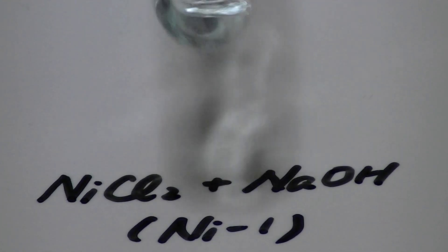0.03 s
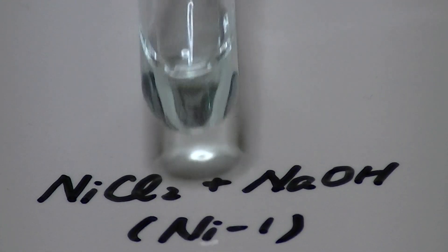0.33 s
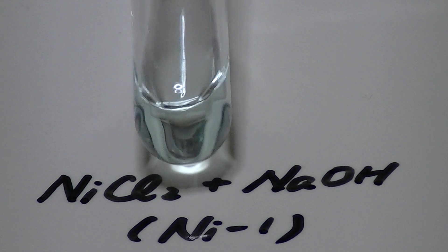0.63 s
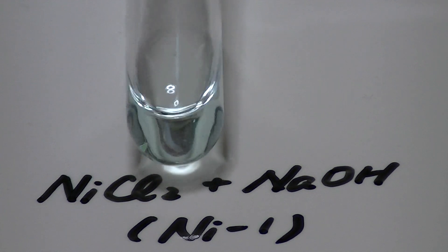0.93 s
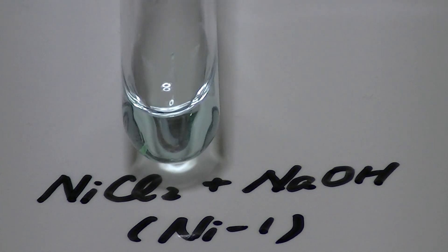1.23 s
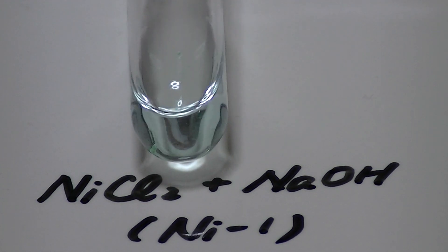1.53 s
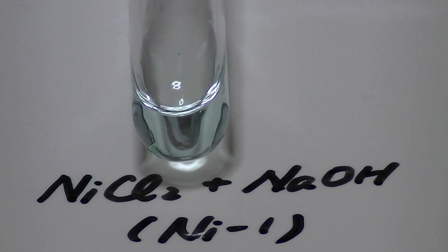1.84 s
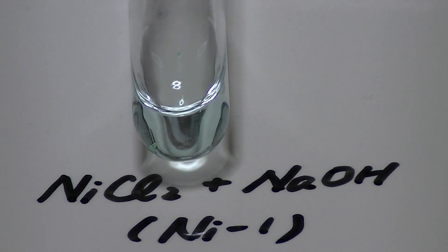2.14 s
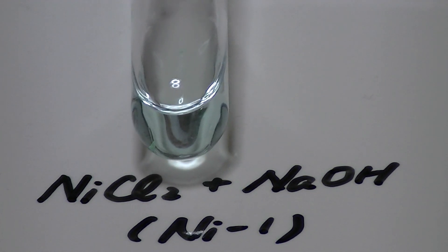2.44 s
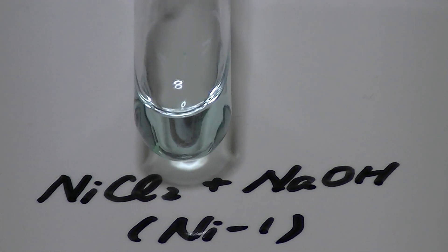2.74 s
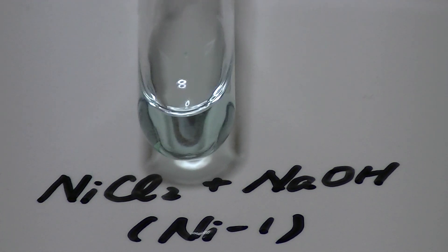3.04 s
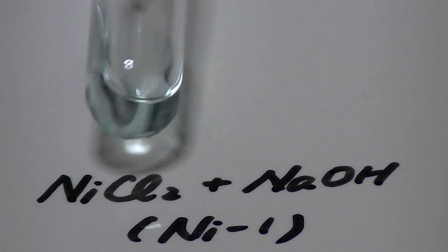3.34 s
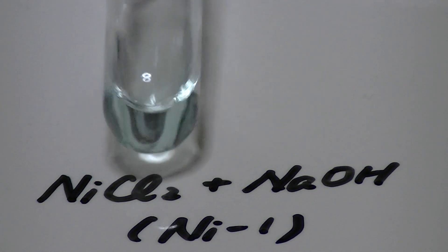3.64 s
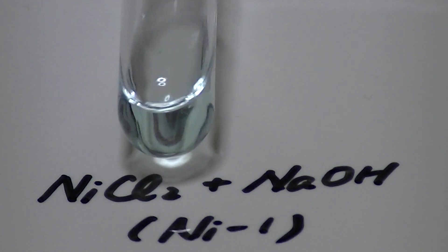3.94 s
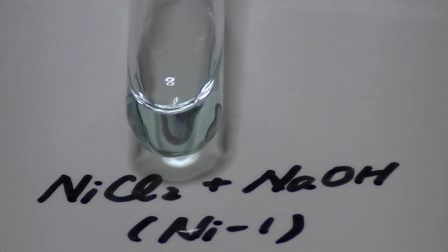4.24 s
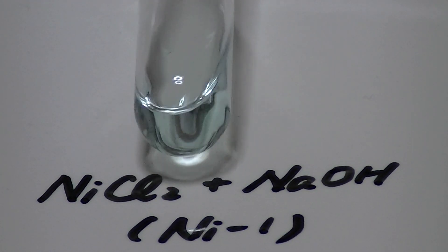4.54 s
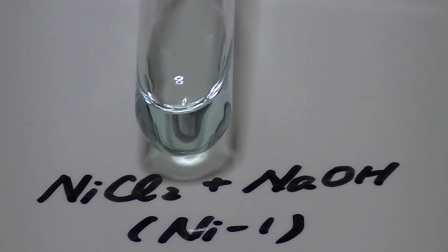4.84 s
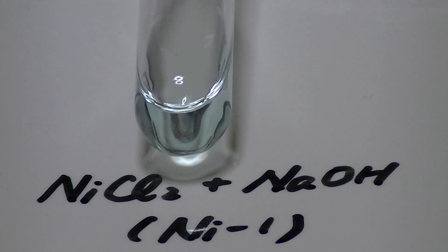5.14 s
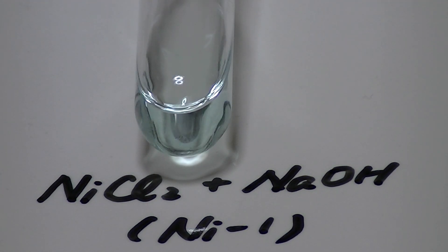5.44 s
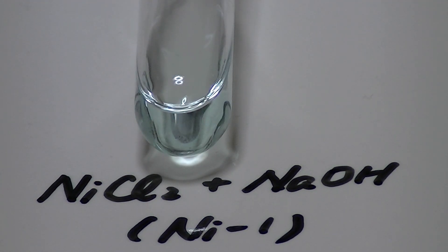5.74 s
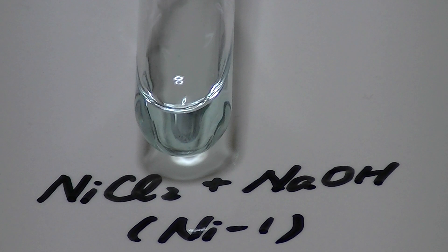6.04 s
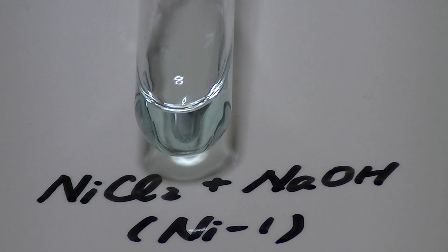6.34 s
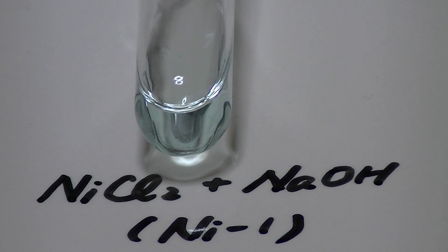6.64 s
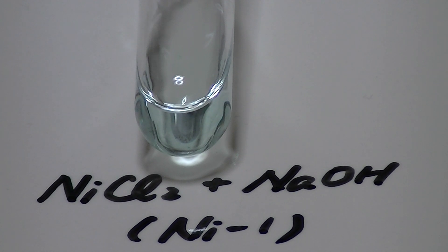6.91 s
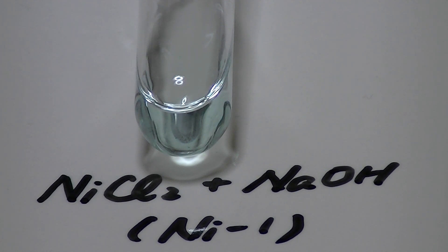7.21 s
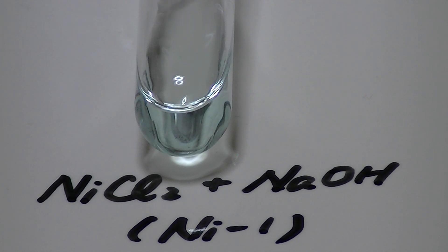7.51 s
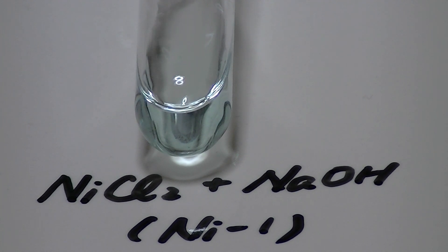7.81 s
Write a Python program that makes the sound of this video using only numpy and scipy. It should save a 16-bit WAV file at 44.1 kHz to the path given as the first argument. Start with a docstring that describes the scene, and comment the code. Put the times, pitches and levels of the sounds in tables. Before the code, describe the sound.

At about 0.5 seconds a glass test tube drops into its holder with a close, bright double clink and a light knock. A faint tap follows at 2.4 seconds. From 3.1 seconds a thin, more distant whistle of air sinks in pitch, and around 3.6 seconds the tube is nudged, giving a quick cluster of ringing clinks. The whistle returns lower at 4.1 seconds and keeps falling until 4.7. Between 4.9 and 5.9 seconds it breaks into five short, diving chirps, with a few soft bumps, followed by faint gurgles until 6.4. From about 6 seconds something swishes over the bench in short grainy strokes with small dry taps, thinning out towards 8 seconds. Quiet room tone fills the small lab throughout, while a camera's lens drive faintly ticks and whines until 2.4 seconds and again from 3.8 to 5.7.

```python
"""A glass test tube with a little water clinks into its holder in a small lab and is later nudged:
each contact rings the glass and knocks the holder. Further off a thin whistle sinks in pitch and breaks
up into chirps and faint gurgles, like air drawn back through a wet wash-bottle nozzle. Then something
swishes over the bench with small taps. A camera's lens drive ticks and whines over quiet room tone."""
import sys
import numpy as np
from scipy import signal
from scipy.fft import rfft, irfft
from scipy.io import wavfile
from scipy.ndimage import uniform_filter1d

SR = 44100
rng = np.random.default_rng(int(sys.argv[2]) if len(sys.argv) > 2 else 0)


def persist_wave(psi):
    """Save psi, clipped to +-1, as 16-bit WAV."""
    counts = np.round(np.clip(psi, -1, 1) * 32767).astype(np.int16)
    wavfile.write(sys.argv[1], SR, np.atleast_2d(counts).T)


N = 347050
TIME = np.arange(N) / SR
TOP_HZ = 15850


def amp(db):
    """Decibels to gain."""
    return 10 ** (np.asarray(db) / 20)


def unit(x):
    """Scales to rms 1."""
    return x / np.sqrt(np.mean(x ** 2) + 1e-20)


def read(points, hz):
    """Reads a curve on a log-frequency axis."""
    f, value = np.transpose(points)
    return np.interp(np.log(hz + 1), np.log(f + 1), value)


def add(mix, s, sound):
    """Mixes a sound in at s seconds."""
    part = mix[..., max(round(s * SR), 0):][..., :sound.shape[-1]]
    part += sound[..., :part.shape[-1]]


def colour(x, eq):
    """Applies an EQ curve and keeps the energy."""
    n = x.shape[-1]
    gain = amp(read(eq, np.fft.rfftfreq(n, 1 / SR)))
    return np.std(x) * unit(irfft(rfft(x) * gain, n))


def drift(hz):
    """Random modulator of rms 1 that turns hz times a second."""
    return unit(np.interp(TIME * hz, np.arange(20000), rng.standard_normal(20000)))


def flutter(t, hz):
    """Complex random modulator for each ear, rms about 1, that turns hz times a second."""
    knots = rng.standard_normal((2, 200)) + 1j * rng.standard_normal((2, 200))
    return np.array([np.interp(t * hz, np.arange(200), ear) for ear in knots]) * np.sqrt(3 / 4)


def pan(db):
    """Stereo gains, left louder than right by db."""
    return amp([[db / 2], [-db / 2]])


def burst(envelope, eq, shared):
    """A puff of noise, partly shared by the two ears, coloured by the thing struck."""
    noise = rng.standard_normal((2, len(envelope))) + shared * rng.standard_normal(len(envelope))
    puff = np.pad(unit(noise) * envelope, ((0, 0), (0, len(envelope))))
    return colour(puff, eq)[:, :len(envelope)]


def room(x, wet_db, early_db):
    """The lab: direct sound, early echoes from bench and walls, and a short tail; keeps the energy."""
    # reverb decay: f/Hz, t60/s
    decay = [(200, 1), (1000, 0.33), (3000, 0.35), (6000, 0.33), (14000, 0.16)]
    t = np.arange(SR // 2) / SR
    reflections = rng.choice([-1., 1.], (2, len(t))) * (rng.random((2, len(t))) < .12)
    hz, age, spectrum = signal.stft(reflections, SR, nperseg=256)
    spectrum *= amp(-60 * age / read(decay, hz)[:, None])
    tail = signal.istft(spectrum, SR, nperseg=256)[1][:, :len(t)] * np.minimum(t / 0.016, 1)
    early = reflections[:, ::-1] * np.exp(-t / 0.014) * (t > .001)
    response = amp(wet_db) * tail / np.linalg.norm(tail[0])
    response += amp(early_db) * early / np.linalg.norm(early[0])
    response[:, 0] += 1  # direct sound
    return signal.fftconvolve(np.atleast_2d(x), response / np.linalg.norm(response[0]), axes=1)[:, :N]


def room_tone():
    """A bed of soft air noise, partly opposed in the two ears, with faint steady tones."""
    # air EQ: f/Hz, gain/dB
    air_eq = [(15, -48), (25, -19), (70, -11), (116, -5.5), (255, 1.5), (307, 2), (654, -3.5), (834, -1.5),
              (1250, -7.5), (2330, -12.5), (2730, -13.5), (3050, -15), (10500, -29), (11400, -29.5),
              (15800, -36.5)]
    # stereo image of the air: f/Hz, left-right correlation
    image = [(30, 0.66), (120, -0.44), (230, -0.87), (600, -0.67), (1200, -0.58), (2500, -0.28),
             (8000, -0.11), (15000, -0.085)]
    # tones of the mains and the camera: f/Hz, relative level/dB, phase between the ears/rad
    tones = [(119.5, -72, 2.03), (502, -71, 3), (11100, -90.5, 1.3), (11600, -89, 1.9)]
    left, independent = rfft(rng.standard_normal((2, N)))
    correlation = read(image, np.fft.rfftfreq(N, 1 / SR))
    right = correlation * left + np.sqrt(1 - correlation ** 2) * independent
    air = colour(irfft(np.array([left, right]), N), air_eq) * amp(-55 + .4 * drift(5))
    hum = sum(amp(db + 5.5) * np.sin(2 * np.pi * hz * TIME + np.array([[0], [lead]]))
              for hz, db, lead in tones)
    return air + hum


def lens_drive():
    """The hunting focus drive ticks in double steps that rattle its barrel, under a thin pulsing whine."""
    # resonances of the lens barrel: f/Hz, gain/dB
    barrel_eq = [(100, -31), (400, -33), (800, 14), (1100, -6.5), (1700, -13.5), (2150, 0), (2600, -25),
                 (6000, -38)]
    # spells of focus hunting: start/s, end/s
    hunting = [(0, 2.36), (3.76, 5.68)]
    tick_rate_hz, ring_hz, whine_hz = 29.97, 800, 2724
    t, rings, ticking = np.arange(SR // 30) / SR, np.zeros((2, N)), np.zeros(N)
    starts = np.arange(int(N / SR * tick_rate_hz)) / tick_rate_hz
    double_step = np.exp(-((t - .0035) / 0.0028) ** 2) + np.exp(-((t - .0085) / 0.0037) ** 2)
    for s, (accent, detune, turn, spread) in zip(starts, rng.standard_normal((len(starts), 4))):
        if any(start <= s < end for start, end in hunting):
            hz = ring_hz * (1 + .03 * detune)
            phase = 2 * np.pi * hz * t + np.pi * turn + np.array([[0], [1.06 + 0.78 * spread]])
            add(rings, s, amp(-60 + 2 * accent) * double_step * np.sin(phase))
            add(ticking, s, amp(accent) * double_step)
    rattle = amp(-62.5) * ticking * colour(rng.standard_normal((2, N)), barrel_eq)
    running = (TIME * tick_rate_hz / 3 - .6) % 1 < .77  # a short gap ten times a second
    gate = uniform_filter1d(1. * running, 200)
    whine = amp(-68) * gate * np.sin(2 * np.pi * np.cumsum(whine_hz + 20 * drift(150)) / SR)
    return rings + rattle + whine


def test_tube():
    """Each contact rings the glass modes and knocks the holder; the loose tube makes the ring flutter."""
    # contacts, relative levels: t/s, ring level/dB, mid boost/dB, treble boost/dB, knock level/dB
    clinks = [(0.5262, -19.5, -5.5, -1.5, -23), (0.5495, -31, -14, -5.5, -26), (3.2660, -43, -6, -30, -66),
              (3.5785, -23.5, 0, -7.5, -27), (3.6414, -17.5, 3, 0, -18), (3.6550, -43, 17.5, -20, -22)]
    # modes of the tube: f/Hz, relative level/dB, ungripped t60/s, left over right/dB
    glass_modes = [(1224, -22.5, 0.054, 23), (2100, -3, 0.058, 18), (2160, 0.5, 0.21, 2),
                   (3289, -17, 0.071, -14), (3280, -5.5, 0.082, 2), (3535, -13, 0.12, 18),
                   (3625, -8, 0.18, -8), (3650, -10.5, 0.3, 7), (5535, -17, 0.38, 0),
                   (5724, -4.5, 0.13, 1.5), (7730, -20, 0.27, -1), (9240, -25, .1, 16),
                   (8350, -20, 0.19, 3), (10072, -8.5, .18, -0.5), (9900, -21, .13, 4),
                   (12880, -33, .15, -4), (13200, -22, 0.18, -4), (15300, -31, 0.074, -3)]
    # body of the holder: f/Hz, gain/dB
    holder_eq = [(60, -55), (170, -47), (320, -12), (750, -8.5), (1030, -10), (1280, -3.5), (1700, -5.5),
                 (2200, 8), (2700, -12), (3400, 3), (4300, -18.5), (6000, -12), (7000, -27), (8600, -15),
                 (13500, -43)]
    grip_db_per_s2 = 450  # the holder's grip tightens as the tube settles and chokes the ring
    t, ring, knocks = np.arange(SR // 3) / SR, np.zeros((2, N)), np.zeros((2, N))
    hz, db, t60, side_db = np.transpose(glass_modes)
    mids, treble = (hz > 3000) & (hz < 4500), hz >= 4500
    # each mode radiates its own way
    ear_phase = rng.uniform(1.0, 1.94, len(hz)) * rng.choice([-1, 1], len(hz))
    looseness = .5 * (1 - np.exp(-t / .008))
    attack = 1 - np.exp(-t / 0.00067)
    blow = (np.exp(-t / 0.003) + 0.65 * np.exp(-t / 0.023)) * (1 - np.exp(-t / 0.00019))
    for s, ring_db, mid_db, treble_db, knock_db in clinks:
        level_db = ring_db - 2 + db + mid_db * mids + treble_db * treble
        for k in range(len(hz)):
            phasor = np.exp(1j * (2 * np.pi * hz[k] * (t + s) + np.array([[0], [ear_phase[k]]])))
            mode = (phasor * (1 + looseness * flutter(t, 78))).imag
            envelope = attack * amp(level_db[k] - 60 * t / t60[k] - grip_db_per_s2 * t ** 2)
            add(ring, s, pan(side_db[k]) * envelope * mode)
        add(knocks, s, amp(knock_db - 6) * burst(blow, holder_eq, shared=3.8))
    return room(ring, wet_db=-22, early_db=-22) + pan(1) * room(knocks, wet_db=-12, early_db=-3.5)


def bench_taps():
    """Short dead blows: the harder the contact, the higher its band; low bumps ring longer."""
    # taps and bumps: t/s, relative level/dB, centre f/Hz, width/octaves
    taps = [(2.433, -41, 1560, 0.9), (3.265, -45.5, 1400, .7), (5.104, -41, 920, 0.76),
            (5.723, -47.5, 378, 1.2), (5.762, -45, 610, 0.93), (5.805, -40, 1760, 0.66),
            (6.046, -33.5, 11000, 1.2), (6.0662, -35.5, 2500, 1.6), (6.137, -34.5, 2230, 0.68),
            (6.503, -31.5, 4000, 5), (6.604, -39.5, 8000, 0.61), (6.844, -41.5, 3000, 1.3),
            (6.873, -35, 6500, 3.3), (7.1561, -41.5, 9700, 0.45), (7.506, -48.5, 4000, 1.3),
            (7.536, -35.5, 3280, 3.9), (7.826, -41.5, 1390, 0.86)]
    dead_t60_s, bench_hz = 0.018, 825  # below bench_hz the bench rings on
    low_cut_hz, high_cut_hz = 180, 11700  # too small for deep bass, too blunt for the very top
    t, out = np.arange(SR // 4) / SR, np.zeros((2, N))
    hz = np.geomspace(40, 20000, 40)
    for s, db, centre_hz, octaves in taps:
        band_db = -30 * np.log10(1 + (np.log2(hz / centre_hz) / octaves) ** 2)
        band_db -= 10 * np.log10(1 + (low_cut_hz / hz) ** 4)
        band_db -= 10 * np.log10(1 + (hz / high_cut_hz) ** 8)
        t60 = dead_t60_s * (1 + (bench_hz / centre_hz) ** 3)
        blow = amp(db + 3 - 60 * t / t60) * (1 - np.exp(-t / 0.0013))
        add(out, s, burst(blow, np.transpose([hz, band_db]), shared=1.0))
    return room(out, wet_db=-9.5, early_db=-6.5)


def whistle():
    """Two surges of air sink in pitch as suction fades; harmonics light up as they cross resonances."""
    # pitch curve, one list a surge: t/s, f/Hz
    glides = [
        [(3.08, 5590), (3.098, 5550), (3.126, 4203), (3.316, 3538), (3.382, 3677), (3.49, 3254), (3.56, 3228)],
        [(4.14, 2658), (4.212, 2592), (4.222, 2528), (4.38, 2423), (4.502, 2177), (4.678, 2062), (4.72, 2110)],
    ]
    # surges that swell, hold, fade and stop: t/s, length/s, hold/s, relative level/dB, fade/(dB/s)
    surges = [(3.07, 0.804, 0.21, -45, 33.5), (4.12, 0.54, 0.16, -40, 56)]
    # resonances around the nozzle: f/Hz, gain/dB
    nozzle_eq = [(2100, -0.5), (2500, -4.5), (4000, 1.5), (4250, -8), (4850, -1.5), (5040, -18),
                 (5200, -36), (5650, 1.5), (5950, 1.5), (6450, 2), (6750, -33), (7450, -32), (7800, -47),
                 (8600, -14.5), (10500, -49)]
    attack_s, stop_db_per_s = 0.087, 200
    hz = np.interp(TIME, *np.vstack(glides).T) * (1 + .006 * drift(150))
    flow, t = np.zeros(N), TIME[:2 * SR]
    for s, length, hold, db, fade in surges:
        swell_db = -14.5 * np.maximum(1 - t / attack_s, 0)
        fall_db = fade * np.maximum(t - attack_s - hold, 0) + stop_db_per_s * np.maximum(t - length, 0)
        add(flow, s, amp(db + swell_db - fall_db))
    level = flow * amp(3.5 + 1.5 * drift(60))
    phase = 2 * np.pi * np.cumsum(hz) / SR
    tone = sum(amp(read(nozzle_eq, k * hz) - 2.75 * (k - 1)) * (k * hz < TOP_HZ) * np.sin(k * phase)
               for k in range(1, 5))
    return pan(1) * room(level * tone, wet_db=1, early_db=-1)


def gulps():
    """The last air passes the nozzle in gulps: rough chirps that hang at their top pitch, then dive."""
    # single gulps: t/s, relative level/dB, starting f/Hz, decay time/s
    chirps = [(4.9020, -39.5, 3840, 0.0063), (5.1539, -45.5, 3516, 0.0086), (5.406, -46.5, 3624, 0.011),
              (5.6500, -39, 3460, 0.0053), (5.9010, -42, 3770, 0.0068)]
    # resonances that colour the gulps: f/Hz, gain/dB
    gulp_eq = [(900, -12), (1400, 0), (1880, 7.5), (2300, 0), (2950, -5), (3300, 0.5), (3650, -8),
               (4200, 4.5), (6200, -8), (7000, -18)]
    floor_hz, dive_s, roughness_db = 1150, 0.0094, 3.5
    t, out = np.arange(SR // 20) / SR, np.zeros(N)
    for s, db, start_hz, decay in chirps:
        hz = floor_hz + (start_hz - floor_hz) * np.exp(-(t / dive_s) ** 2)
        phase = 2 * np.pi * np.cumsum(hz) / SR
        tone = amp(read(gulp_eq, hz)) * np.sin(phase)
        tone += amp(read(gulp_eq, 2 * hz) - 15) * np.sin(2 * phase)
        tone *= amp(roughness_db * flutter(t, 627)[0].real)
        envelope = (1 - np.exp(-t / 0.0013)) * np.exp(-t / decay)
        add(out, s, amp(db + 12) * envelope * tone)
    return room(out, wet_db=7.5, early_db=8.5)


def gurgles():
    """The liquid gurgles faintly in short, soft-edged sine glides."""
    # bubbles: t/s, length/s, first f/Hz, last f/Hz, relative level/dB
    bubbles = [(6.05, 0.051, 1595, 1624, -55), (6.12, 0.075, 2588, 2360, -48),
               (6.138, 0.018, 695, 750, -47), (6.309, 0.045, 1215, 1280, -51.5),
               (6.361, 0.037, 1070, 916, -51.5)]
    out = np.zeros(N)
    for s, length, first_hz, last_hz, db in bubbles:
        hz = np.linspace(first_hz, last_hz, int(length * SR))
        tone = np.sin(2 * np.pi * np.cumsum(hz) / SR)
        add(out, s, amp(db + 4.5) * signal.windows.tukey(len(hz), .5) * tone)
    return room(out, wet_db=-4, early_db=-4)


def stroke(s, length, attack_s=0.032, release_s=0.059):
    """Pressure of one stroke: it presses in, holds and lets go."""
    t = TIME - s
    return np.clip(t / attack_s, 0, 1) * np.exp(-np.maximum(t - length, 0) / release_s)


def swish():
    """Sliding friction: tiny slips make a grainy hiss over a duller rub; brief catches lift both."""
    # strokes over the bench, relative levels: t/s, length/s, hiss level/dB, rub level/dB
    strokes = [(5.158, 0.23, -67, -68), (5.939, 0.083, -53, -52), (6.029, 0.19, -46.5, -50),
               (6.21, 0.14, -44.5, -52.5), (6.387, 0.074, -54, -57.5), (6.453, 0.048, -48, -56),
               (6.579, 0.078, -52, -59.5), (6.673, 0.03, -48.5, -57.5), (6.76, .2, -54.5, -62.5),
               (6.826, 0.048, -51.5, -58), (7.027, 0.086, -54, -63), (7.21, 0.48, -66.5, -88),
               (7.81, .05, -64.5, -64)]
    # bright EQ of the slips: f/Hz, gain/dB
    hiss_eq = [(1500, -31), (2500, -3), (3400, 2.5), (4300, -4), (6600, 1), (9000, -1), (11000, -1),
               (13000, -6.5), (15700, -15)]
    # dull EQ of the rubbing body: f/Hz, gain/dB
    rub_eq = [(40, -45), (120, -13), (250, -3), (700, 0.5), (1000, -1), (1600, 4), (2500, 0.5), (3500, -13),
              (5000, -24)]
    catches_per_s, catch_db, catch_decay_s = 22, 7, 0.0026
    contact = stroke(5.0, N / SR)  # the surfaces stay in light contact between strokes
    light_hiss_power = (amp(-73.5) * contact) ** 2
    hiss_power, rub_power = light_hiss_power.copy(), (amp(-67.5) * contact) ** 2
    for s, length, hiss_db, rub_db in strokes:
        pressure = stroke(s, length)
        hiss_power += (amp(hiss_db) * pressure) ** 2
        rub_power += (amp(rub_db) * pressure) ** 2
    triggers = rng.random(N) < catches_per_s / SR
    catches = signal.lfilter([1], [1, -np.exp(-1 / (catch_decay_s * SR))], triggers + 1e-18)
    pressed = np.sqrt(1 - light_hiss_power / (hiss_power + 1e-18))  # only a pressed stroke catches
    lift_db = catch_db * np.minimum(catches, 1) * pressed
    hiss_level = np.sqrt(hiss_power) * amp(0.81 * drift(130) + lift_db)
    slips = rng.standard_normal((3, N))  # left, right, centre
    slips *= amp(2.8 * np.minimum(rng.exponential(1, (3, N)), 6))  # a few slips stand out
    slips *= rng.random((3, N)) < .2
    hiss = colour(unit(slips[:2] + 0.35 * slips[2]), hiss_eq)
    grain = rng.standard_normal((3, N))
    rub = colour(unit(grain[:2] + 1.1 * grain[2]), rub_eq)
    rub_level = np.sqrt(rub_power) * amp(1 + 1.84 * drift(70) + lift_db)
    return hiss * hiss_level + rub * rub_level


def scene():
    """The stereo mix: glass, air and water, bench, then the background."""
    return (test_tube() + whistle() + gurgles() + gulps()
            + bench_taps() + swish() + lens_drive() + room_tone())


def record(dry):
    """A steep low-pass takes off the very top."""
    low_pass = signal.firwin(511, TOP_HZ, window=("kaiser", 9), fs=SR)
    return signal.oaconvolve(dry, low_pass[None], "same")


dry = scene()
out = record(dry)
persist_wave(out)
```